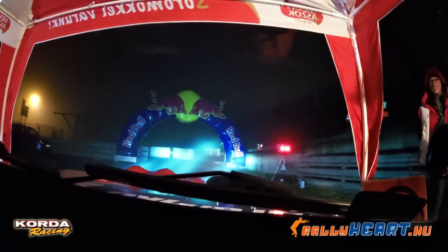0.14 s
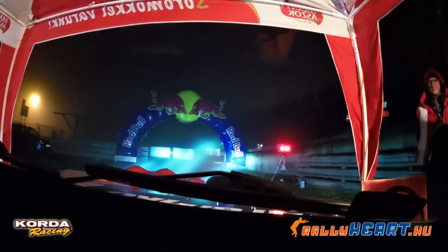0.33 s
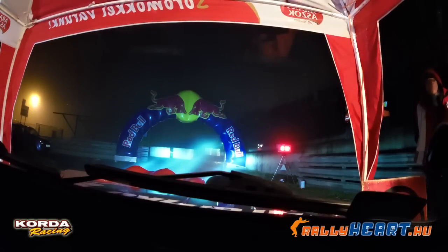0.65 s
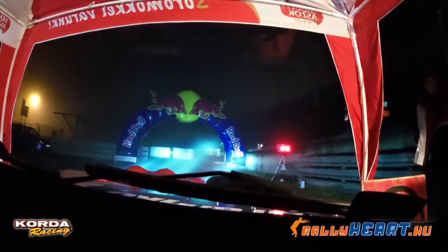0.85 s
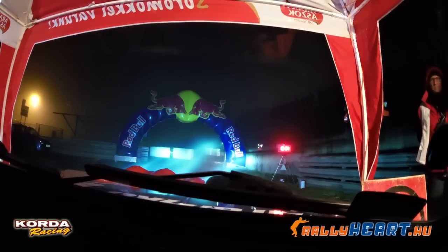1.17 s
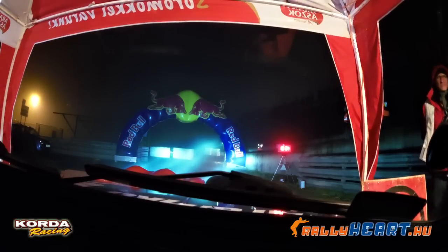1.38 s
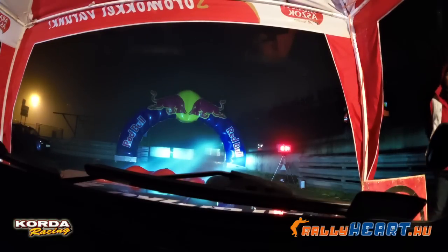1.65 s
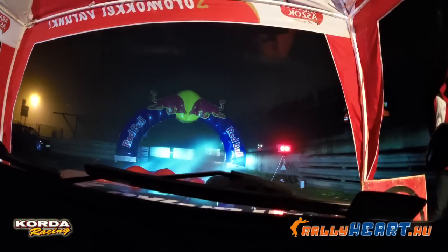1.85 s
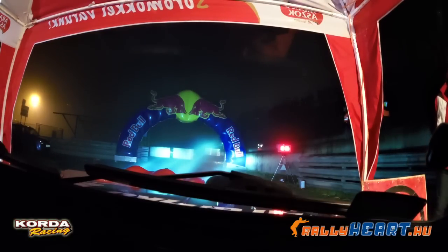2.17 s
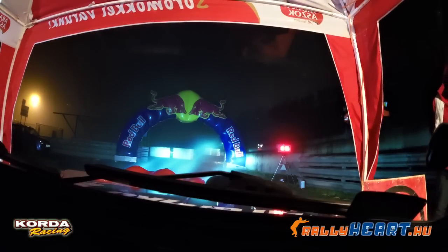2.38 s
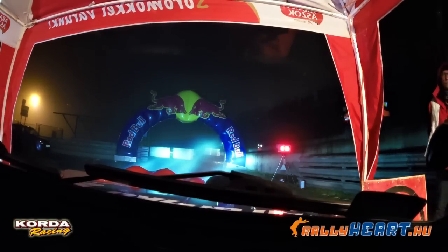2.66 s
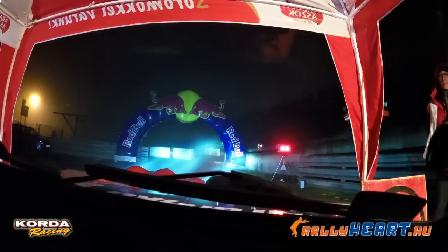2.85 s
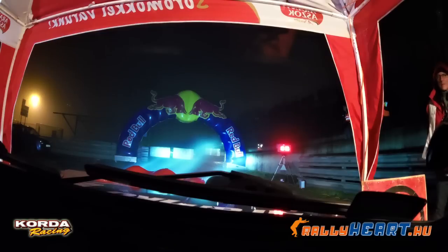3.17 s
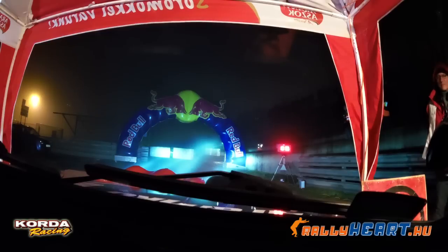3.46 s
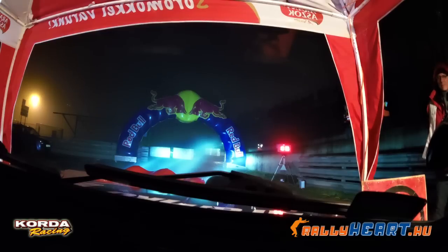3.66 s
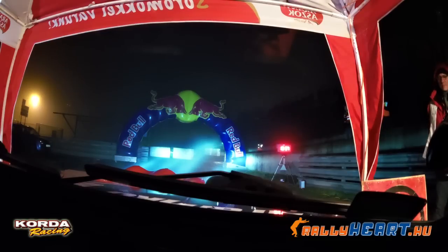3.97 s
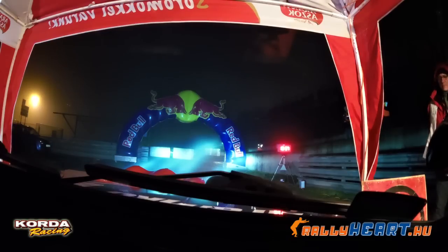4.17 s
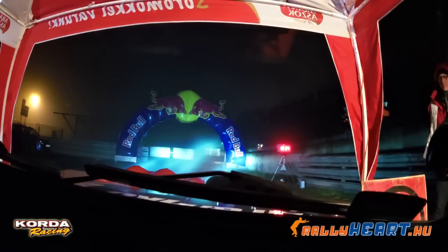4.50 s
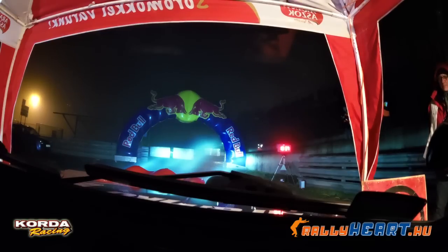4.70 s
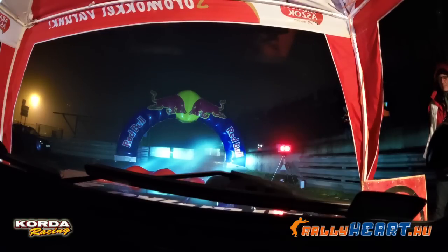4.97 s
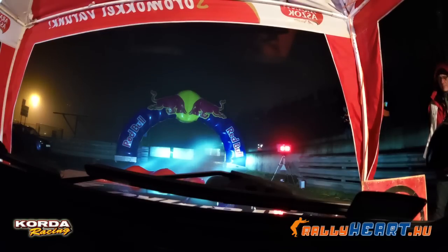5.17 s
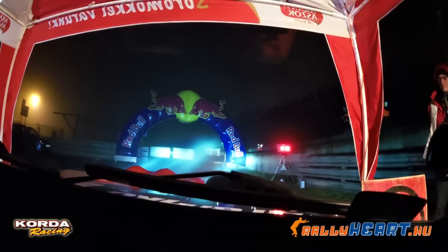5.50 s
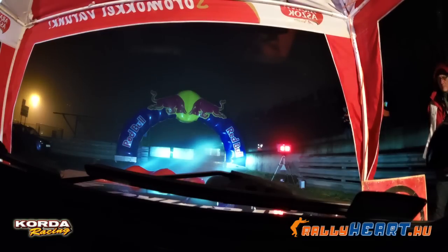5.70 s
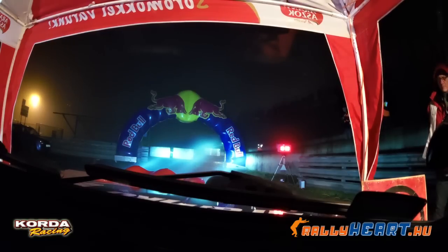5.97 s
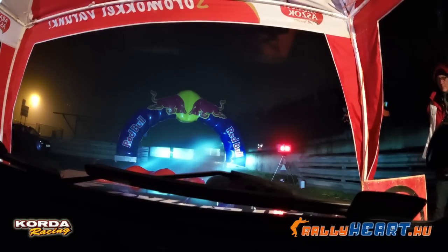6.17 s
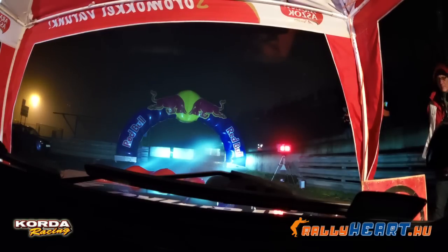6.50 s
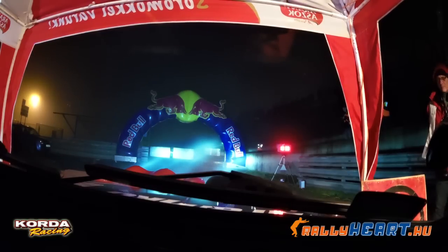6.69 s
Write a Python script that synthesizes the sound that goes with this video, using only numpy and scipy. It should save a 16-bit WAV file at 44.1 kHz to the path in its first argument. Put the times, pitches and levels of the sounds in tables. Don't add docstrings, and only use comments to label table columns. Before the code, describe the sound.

Inside a stationary rally car at night, a four-cylinder engine is blipped about once a second. Each stab makes a quick rising growl, then a slower fall with pops, ticks and panel rattle. Six blips pass before a final, higher pull breaks into dense crackling at full revs. The small cabin microphone is close and boomy, slightly overloaded on peaks.

```python
import sys
import numpy as np
from scipy import signal
from scipy.fft import rfft, irfft, next_fast_len
from scipy.io import wavfile
from scipy.ndimage import uniform_filter1d

SR = 44100
rng = np.random.default_rng(int(sys.argv[2]) if len(sys.argv) > 2 else 0)


def unload_audio(sound):
    columns = np.transpose(np.atleast_2d(sound))
    steps = np.round(np.clip(columns, -1, 1) * 32767)
    wavfile.write(sys.argv[1], SR, steps.astype(np.int16))


def rack_gain(trim_db):
    fader = np.asarray(trim_db, float)
    return 10 ** (fader / 20)


N = 301644
TIME = np.arange(N) / SR
HZ = np.fft.rfftfreq(next_fast_len(N + SR), 1 / SR)
STEP_S = .002
STEP = np.arange(0, N / SR + STEP_S, STEP_S)

# pedal down t/s, pedal up t/s, firing rate at lift f/Hz, rocking after lift level/dB
BLIPS = [
    (0.0, 0.218, 211.3, -20.5),
    (1.041, 1.278, 241.6, -30.5),
    (2.196, 2.486, 223.9, -29),
    (3.315, 3.597, 236.8, -22.5),
    (4.423, 4.646, 232.2, -23.5),
    (5.395, 5.635, 238.5, -25.5),
    (6.391, 6.72, 277.3, -24),
]
# time along coast t/s, firing rate f/Hz
COAST = [(-0.1, 284.7), (0.118, 261.8), (0.29, 240), (0.438, 215.1), (0.6, 194.4), (0.784, 164.7),
         (0.95, 145.3), (1.083, 130.3), (1.3, 103.6)]
ORDERS_DB = [-13, -24, -32.5, -40, -43, -44]
# multiple of firing rate [1], level/dB
IMBALANCE = [(1.25, -28), (1.5, -24), (1.75, -32), (2.5, -28), (3.5, -29), (4.5, -34)]
# t/s, level/dB
SURGES = [(0.119, 1), (0.199, 7), (0.331, -7), (6.74, 6.5), (1.31, 10.5), (1.402, 13.5), (1.529, 9.5),
          (2.27, 2), (2.304, -8), (2.351, 4.5), (2.435, 3.5), (2.49, -10), (2.55, -5), (6.559, 4.5),
          (3.599, 5.5), (3.709, 12.5), (3.781, -5), (3.821, 8), (2.227, 8.5), (4.655, 3), (4.831, 8.5),
          (6.649, 6), (5.564, 4.5), (5.635, 5), (5.76, 9.5), (5.879, 9.5), (6.625, 9), (6.691, 4),
          (6.77, 9), (6.817, 7)]
# f/Hz, level/dB
CABIN = [(30, -40), (92, -14), (108, -2), (150, 3), (190, -1), (237, 5.5), (275, 7), (340, 5.5), (400, 2),
         (470, 2), (520, -2), (660, 1), (2000, -22)]
# f/Hz, width/Hz, depth level/dB
NULLS = [(120, 14, -6), (137, 14, -12), (167, 30, -19), (204, 9, -10), (274, 8, -6), (303, 50, -19),
         (378, 50, -22), (407, 25, -12), (437, 28, -12), (505, 50, -12), (620, 40, -12)]
# f/Hz, width/Hz, level/dB
MOUNTS = [(152, 36, 0)]
# f/Hz, level/dB per Hz
RATTLE = [(52, -31), (70, -14), (200, -5.5), (350, -6.5), (503, -10.5), (773, -10.5), (1060, -11.5),
          (1360, -16.5), (1450, -21), (1680, -23.5), (1800, -29), (3570, -41), (5240, -64.5), (8000, -74),
          (16000, -98)]
# f/Hz, width/Hz, level above the rest/dB
TRIM = [(703, 15, -1.5), (774.5, 41, 2), (1061.3, 16, 2), (1312, 19, 1.5), (1619, 17, 4.5),
        (1770, 18, -12.5), (2574, 70, 1), (3600, 60, 1.5)]
# firing rate f/Hz, rattle level/dB
SHIVER = [(107, -31), (120, -33.5), (133, -24), (145, -32), (157, -22.5), (170, -25.5), (190, -25.5),
          (205, -22), (222, -22), (240, -19)]
# t/s, half length/s, crackle level/dB, rattle level/dB
BACKFIRES = [(1.311, 0.021, -26, -11.5), (1.277, .04, -42.5, -21), (1.4, .08, -42.5, -24),
             (3.623, 0.014, -36.5, -24), (3.724, .03, -40.5, -17), (3.574, .03, -47, -21),
             (4.645, 0.0088, -37.5, -24), (4.714, 0.042, -38.5, -24), (5.62, 0.039, -39, -14),
             (5.759, .02, -37.5, -16.5), (6.638, 0.046, -25.5, -14.5), (6.671, .012, -16.5, -7.5),
             (6.692, .018, -15, -3.5), (6.717, .018, -23.5, -12), (6.745, 0.013, -14, -8.5),
             (6.77, 0.022, -14, -8), (6.803, 0.038, -14, -4), (6.835, 0.022, -18, -7.5)]
# f/Hz, level/dB
CRACKLE_COLOUR = [(300, -32), (900, 5), (2000, 4), (3600, -3.5), (4600, -12), (6500, -30.5), (10000, -43),
                  (16000, -60)]
# t/s, peak level/dB
POPS = [(0.0804, -34), (0.2504, -43.5), (1.186, -54), (1.2332, -33), (1.2665, -26.5), (1.3101, -22),
        (1.3899, -25), (2.257, -39), (3.5737, -28), (3.6185, -25), (3.6725, -30.5), (3.708, -25),
        (3.7733, -26.5), (4.6483, -25), (5.749, -26), (6.599, -25)]
# f/Hz, level/dB
POP_COLOUR = [(150, 0.5), (600, 0), (2000, 12), (3600, -7.5), (6000, -28.5), (10000, -54)]
# f/Hz, level/dB per Hz
RUMBLE = [(12, -49.5), (20, -14), (38, -16), (100, -8), (130, -36), (220, -120)]
# f/Hz, level/dB
IMAGES = [(7812, -68), (11718, -71)]


def evened(x):
    return x / np.sqrt(np.mean(x ** 2))


def shaped(x, response):
    size = next_fast_len(N + SR)
    return irfft(rfft(x, size) * response, size)[:N]


def spectrum(points):
    f, db = np.transpose(points)
    return rack_gain(np.interp(np.log(HZ + 1), np.log(f + 1), db))


def modes(table):
    return sum(rack_gain(db) * 1j * HZ * width / (hz ** 2 - HZ ** 2 + 1j * HZ * width) for hz, width, db in table)


def wander(rate_hz):
    return evened(shaped(rng.standard_normal(N), np.exp(-(HZ / rate_hz) ** 2)))


def hump(x, centre, width):
    return np.exp(-((x - centre) / width) ** 2)


def slow(control):
    return np.interp(TIME, STEP, control)


def decibels(gain):
    return 20 * np.log10(gain)


def revs_and_pedal():
    idle_hz, pull_curve, inertia_s = 112.22, 1.4, .03
    along, speed = np.transpose(COAST)
    hz, pedal = np.full(len(STEP), idle_hz), np.zeros(len(STEP))
    for down, up, peak, _ in BLIPS:
        start = np.interp(down, STEP, hz)
        share = np.clip((STEP - down) / (up - down), 0, 1)
        pull = start + (peak - start) * (1 - (1 - share) ** pull_curve)
        joined_s = np.interp(-peak, -speed, along)
        coast = np.interp(STEP - up + joined_s, along, speed)
        hz = np.where(STEP < down, hz, np.where(STEP < up, pull, coast))
        pedal = pedal + (STEP >= down) * (STEP < up)
    inertia = np.exp(-abs(np.arange(-50, 51)) * STEP_S / (inertia_s / 4))
    hz = np.convolve(np.pad(hz, 50, "edge"), inertia / inertia.sum(), "valid")
    return hz, uniform_filter1d(pedal, size=14)


def note_db(hz, pedal):
    hunt_db, hunt_hz, surge_s = -2.5, 216, .018
    db = hunt_db * np.clip((hz - hunt_hz) / 8 + 1, 0, 1)
    db += sum(surge * hump(STEP, s, surge_s) for s, surge in SURGES)
    db += 2 * pedal * hump(hz, 170, 22)
    return db + 4 * np.clip((hz - 255) / 12, 0, 1)


def pedal_jolt():
    jolt_s = .021
    return sum(hump(STEP, down + jolt_s / 2, jolt_s) for down, *_ in BLIPS)


def unevenness_db(hz, pedal, jolt):
    return 1.5 - 6.5 * (1 - pedal) * hump(hz, 141, 12) + 8 * jolt


def shake_db(hz, pedal, jolt):
    swell_s = .22
    crank = rack_gain(-44.5) + rack_gain(-21) * (1 - pedal) * hump(hz, 215.7, 16) + rack_gain(-33) * jolt
    crank += rack_gain(-19) * np.clip((hz - 235) / 30, 0, 1)
    lift = sum(rack_gain(db) * hump(STEP, up + swell_s / 2, swell_s / 2) for _, up, _, db in BLIPS)
    rocking = rack_gain(-34) + lift + rack_gain(-5) * jolt
    return decibels(crank), decibels(rocking)


def loose_db(hz, pedal):
    effort = np.clip(uniform_filter1d(np.gradient(hz, STEP), size=30) / 450, 0, 1.5)
    pulling_db = -22 + .0625 * (hz - 170) + 3.5 * (effort - 1)
    coasting_db = np.interp(hz, *np.transpose(SHIVER))
    panels_db = pedal * pulling_db + (1 - pedal) * coasting_db
    fires = np.array([hump(STEP, s, half) * rack_gain(np.array([[crack_db], [knock_db]]))
                      for s, half, crack_db, knock_db in BACKFIRES]).max(axis=0)
    puffs = rack_gain(-57 + 1.1 * (panels_db + 19) - 8.5 * pedal) + rack_gain(-62)
    rattle_db = decibels(np.maximum(rack_gain(panels_db), fires[1]))
    return rattle_db, decibels(np.maximum(puffs, fires[0]))


def engine(hz, turns, ragged_db, drive_db):
    accessory = 4.92
    revs = np.clip((hz - 150) / 70, 0, 1.5)
    flutter_db = 1.8 + 1.3 * revs
    pull = np.clip(np.gradient(hz) * SR / 400 * np.clip((230 - hz) / 70, 0, 1), 0, 1)
    load_db = 2 * uniform_filter1d(pull, size=1500)
    firing = np.zeros(N)
    for k, db in enumerate(ORDERS_DB):
        if k < 3:
            vary_db = load_db * (2 - k) - .9 * np.maximum(drive_db, 0)
            vary_db = vary_db + (flutter_db + load_db / 2) * wander(18 + 6 * k)
            vary_db = min(k, 1) * vary_db
        else:
            vary_db = 4.5 * wander(14)
        firing += rack_gain(db + vary_db) * np.cos(2 * np.pi * (k + 1) * turns)
    firing += rack_gain(-41 + 6 * revs + 4 * wander(12)) * np.cos(2 * np.pi * accessory * turns)
    firing *= rack_gain(drive_db + 1.6 * revs * wander(22))
    uneven = sum(rack_gain(db + 4.5 * wander(12)) * np.cos(2 * np.pi * (k * turns + rng.random()))
                 for k, db in IMBALANCE)
    strength = rng.standard_normal(2000)[turns.astype(int)]
    scatter = evened(strength * np.sin(np.pi * turns) ** 2 * np.sin(2 * np.pi * turns))
    ragged = rack_gain(np.clip(ragged_db, -8, 5) + 6.34 * revs)
    return np.sqrt(2) * (firing + ragged * (rack_gain(-14.5) * uneven + rack_gain(-29.5) * scatter))


def cabin():
    cuts = [(hz ** 2 - HZ ** 2 + 1j * HZ * width * rack_gain(db)) / (hz ** 2 - HZ ** 2 + 1j * HZ * width)
            for hz, width, db in NULLS]
    return spectrum(CABIN) * np.prod(cuts, axis=0)


def shake(turns, crank_db, rocking_db):
    crank = rack_gain(crank_db + 2.2 * wander(20)) * np.cos(np.pi * turns)
    rocking = rack_gain(rocking_db + 2.2 * wander(16)) * np.cos(3 / 2 * np.pi * turns * 1)
    return np.sqrt(2) * (crank + shaped(rocking, modes(MOUNTS) ** 2))


def rattle(turns, rattle_db):
    knock = rack_gain(2.2 * rng.standard_normal(2000))[turns.astype(int)]
    gate = .55 + knock * np.exp(-(turns % 1) / .45)
    colour = spectrum(RATTLE) * (1 + abs(modes(TRIM)) ** 2)
    return rack_gain(rattle_db + .58 * wander(25)) * evened(shaped(gate * rng.standard_normal(N), colour))


def crackle(turns, level_db):
    snap = rack_gain(4 * np.minimum(rng.exponential(1, 2000), 2.5))[turns.astype(int)]
    puffs = (.22 + snap * np.exp(-(turns % 1) / .24)) * rng.standard_normal(N)
    colour = spectrum(CRACKLE_COLOUR) * (1 + abs(modes(TRIM)) ** 2)
    return rack_gain(level_db - 1.5) * evened(shaped(puffs, colour))


def pops():
    decay_s = .005
    kicks = np.zeros(N)
    for s, db in POPS:
        kicks[round(s * SR)] = rack_gain(db)
    burst = signal.lfilter([1], [1, -np.exp(-1 / (decay_s * SR))], kicks)
    burst = uniform_filter1d(burst, size=60)
    return rack_gain(1) * shaped(burst * rng.standard_normal(N), spectrum(POP_COLOUR))


def rumble():
    return rack_gain(-47) * evened(shaped(rng.standard_normal(N), spectrum(RUMBLE)))


def scene():
    speed, pedal = revs_and_pedal()
    jolt = pedal_jolt()
    hz = slow(speed)
    turns = np.cumsum(hz) / SR
    ragged_db, drive_db = slow(unevenness_db(speed, pedal, jolt)), slow(note_db(speed, pedal))
    crank_db, rocking_db = map(slow, shake_db(speed, pedal, jolt))
    rattle_db, crackle_db = map(slow, loose_db(speed, pedal))
    mix = shaped(engine(hz, turns, ragged_db, drive_db), cabin())
    mix += shake(turns, crank_db, rocking_db)
    mix += rattle(turns, rattle_db) + crackle(turns, crackle_db)
    return (mix + pops() + rumble())[None]


def band_limit(x):
    return signal.sosfilt(signal.butter(12, 15830, fs=SR, output="sos"), x)


def record(dry):
    headroom = 1.25
    x = np.clip(headroom * np.tanh(1.074 * dry / headroom), -1, 1)
    x = x * np.clip(TIME / .0003 + .22, 0, 1)
    x = x * (1 + sum(rack_gain(db) * np.cos(2 * np.pi * hz * TIME) for hz, db in IMAGES))
    x = x + rack_gain(-84.5 + 2 * wander(30)) * rng.standard_normal(N)
    return band_limit(x)


dry = scene()
out = record(dry)
unload_audio(out)
```